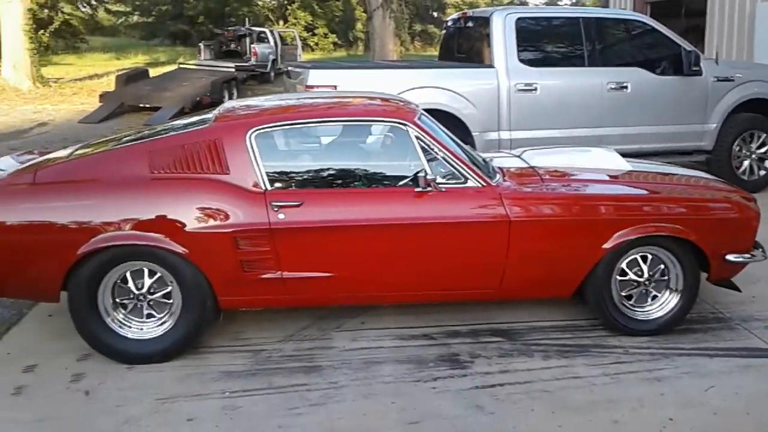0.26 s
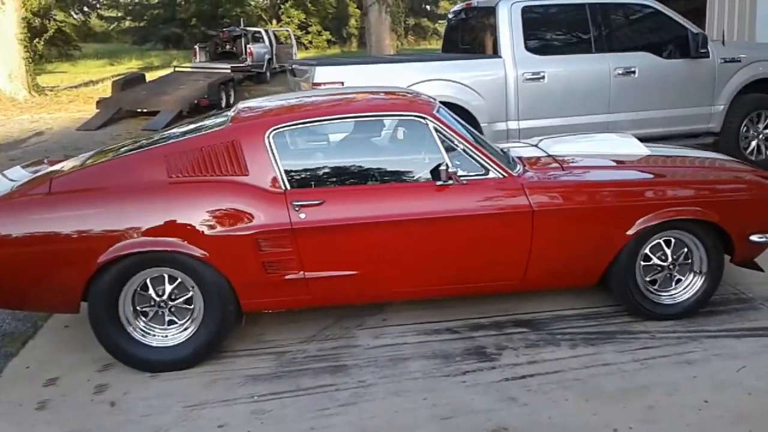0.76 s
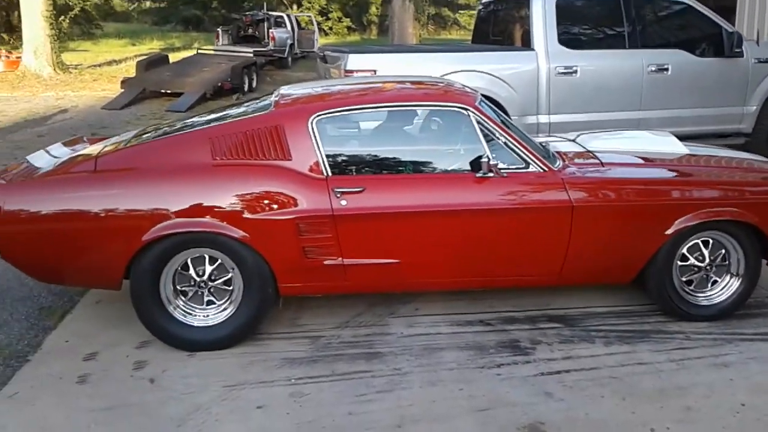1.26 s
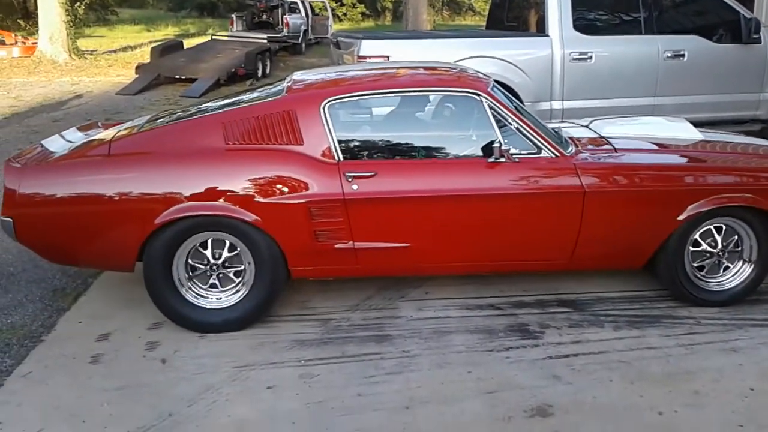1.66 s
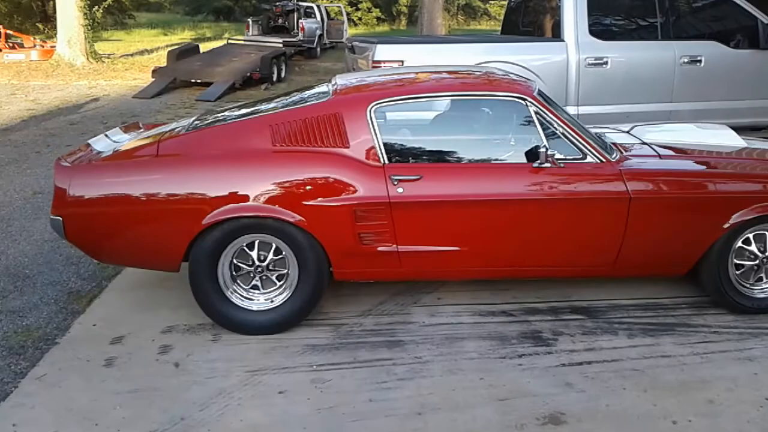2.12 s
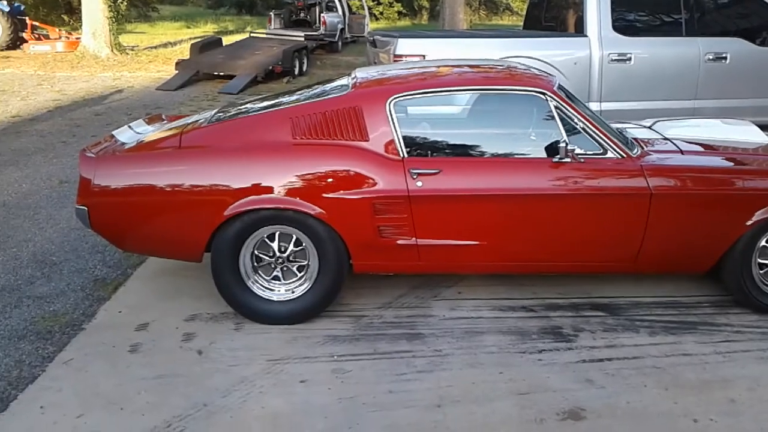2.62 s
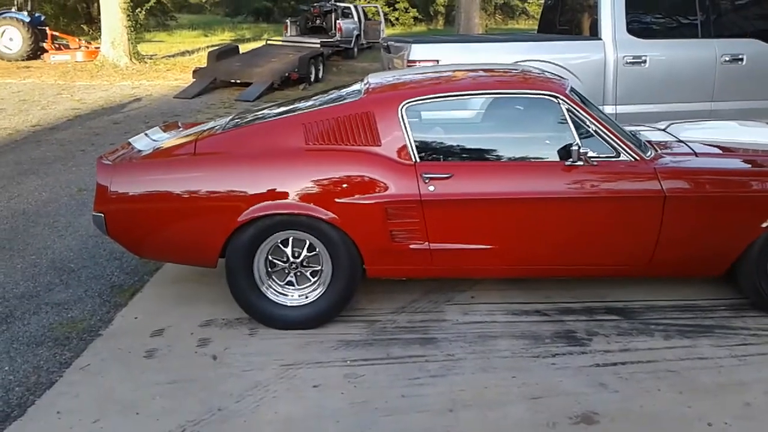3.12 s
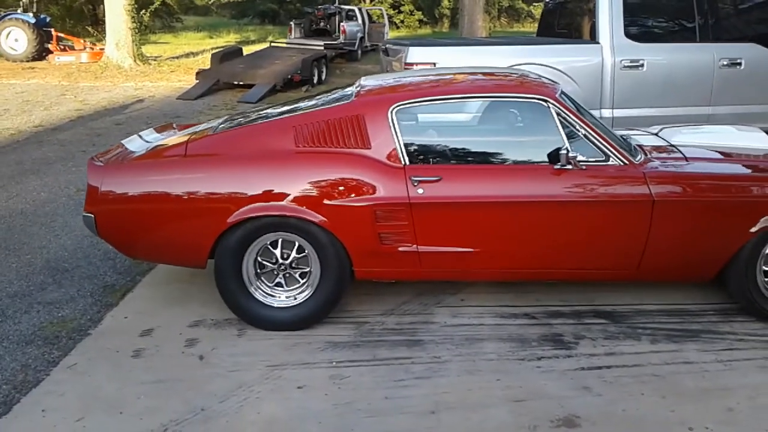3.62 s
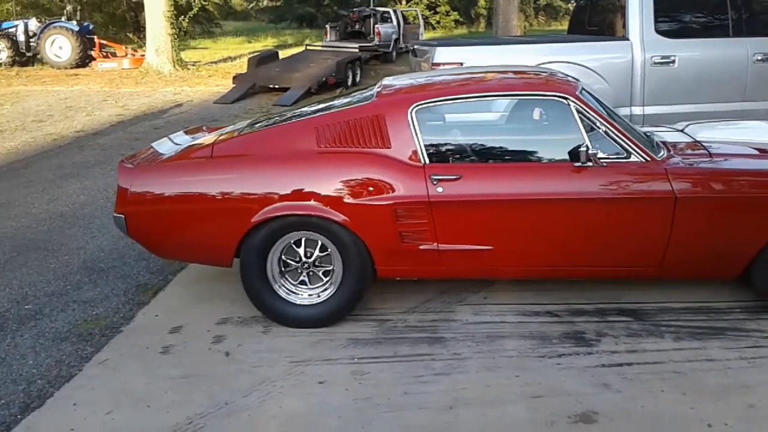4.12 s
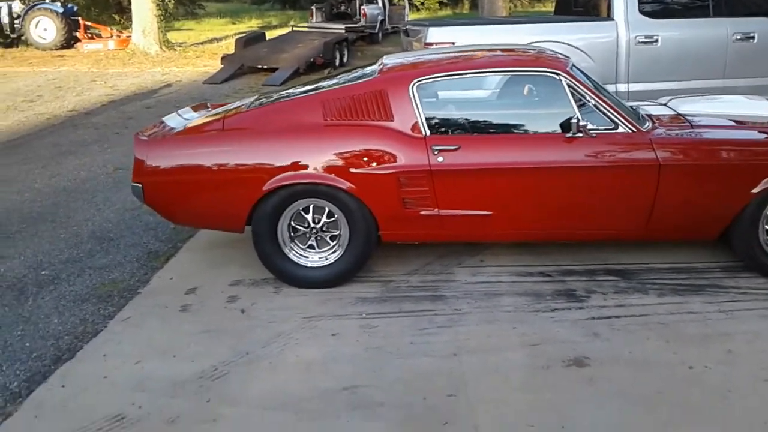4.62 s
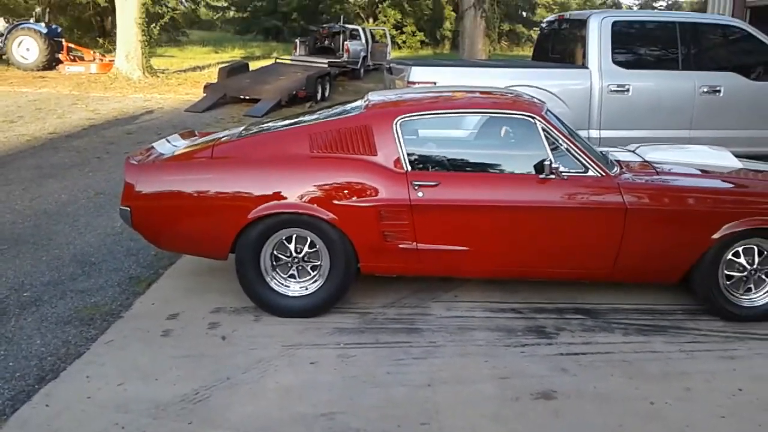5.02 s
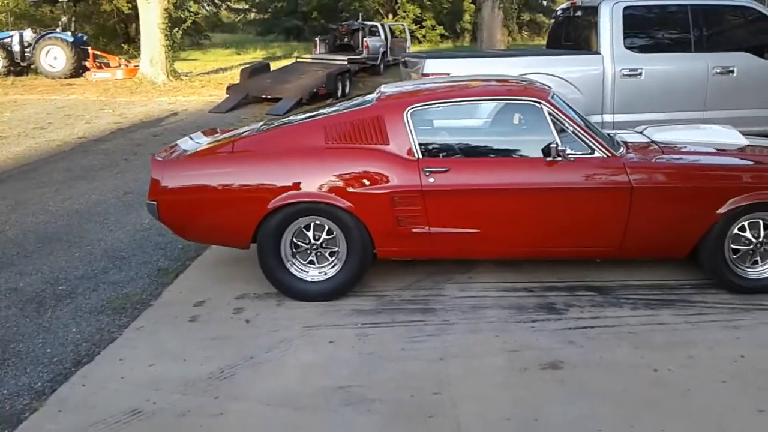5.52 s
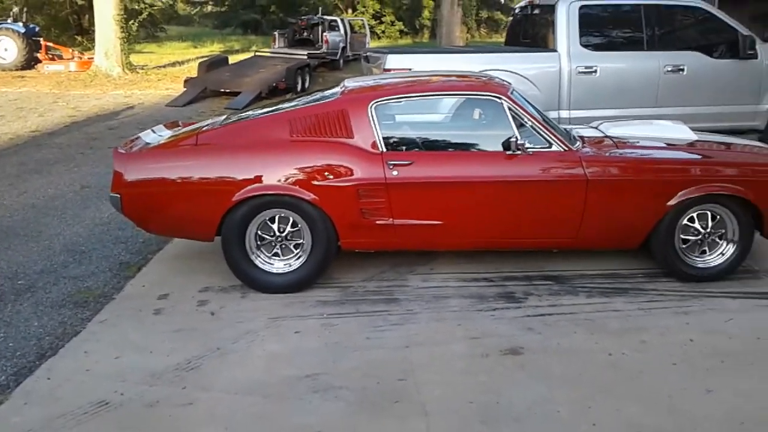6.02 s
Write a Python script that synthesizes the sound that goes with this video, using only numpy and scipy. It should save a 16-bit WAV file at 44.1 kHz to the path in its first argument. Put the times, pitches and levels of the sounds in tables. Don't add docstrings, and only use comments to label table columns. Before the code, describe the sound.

Outdoors, close and dry, a powerful car engine first runs smoothly at a low buzzing hum. After nearly a second it revs violently, pitch about tripling into a tearing, noisy bellow. It cuts off with a small pop and tumbles down within half a second. Then comes a long rough idle: uneven clusters of booming firings, short gaps, hollow barks, gas rasp and hiss, clipped and gritty on the phone microphone.

```python
import sys
import numpy as np
from scipy import signal
from scipy.fft import rfft, irfft, next_fast_len
from scipy.io import wavfile
from scipy.ndimage import uniform_filter1d, map_coordinates

SR = 44100
rng = np.random.default_rng(int(sys.argv[2]) if len(sys.argv) > 2 else 0)


def to_wav(sig):
    pcm = np.clip(np.atleast_2d(sig), -1, 1) * 32767
    pcm = np.round(pcm).astype(np.int16)
    wavfile.write(sys.argv[1], SR, pcm.T)


def nominal_scale(level):
    x = np.asarray(level, float) / 20
    return 10 ** x


N = 276507
TIME = np.arange(N) / SR

# time_s, shaft_turns_per_s
SPEED = [(0, 24.4), (.4, 24.7), (.7, 25.1), (.8, 25.7), (.89, 28), (.95, 33), (1.06, 45), (1.2, 59),
         (1.29, 65.5), (1.41, 70.3), (1.5, 73.4), (1.74, 74), (1.814, 63.8), (1.89, 52.5), (2.002, 42),
         (2.08, 30), (2.16, 25.5), (2.25, 24)]
# time_s, roar_db
THROTTLE = [
    (.8, -64),
    (.92, -28),
    (1.0, -17.5),
    (1.03, -9),
    (1.25, -7),
    (1.69, -7.3),
    (1.75, -22),
    (1.93, -37),
    (2.1, -70),
]
# frequency_hz, level_db
PIPE = [(55, -38), (88, -8), (115, -3.5), (124, -11), (142, -15), (205, -7), (250, -22), (300, -21)]
# order_per_turn, level_db
SHARP_ORDERS = [(12, -26), (20, -35)]
# order_per_turn, level_db
COASTING_ORDERS = [(1.5, -23), (2, -10.5), (2.5, -5.5), (4, -21), (5, -23.5), (6, -27)]
# start_s, firings_count, spacing_s, boom_db
FIRING_RUNS = [(2.27, 3, 0.048, -2.5), (2.468, 2, 0.085, -2), (2.621, 3, 0.041, -2), (2.761, 2, .043, -2.5),
               (2.877, 2, .036, -2.5), (2.936, 4, 0.036, -1), (3.088, 3, 0.036, -0.5), (3.238, 2, .036, -3),
               (3.32, 4, .022, -5.5), (3.421, 2, .039, -1), (3.487, 4, .0217, -5), (3.603, 2, .04, -6.5),
               (3.689, 2, .029, 0), (3.787, 5, 0.026, 0.5), (3.911, 3, 0.045, -1.5),
               (4.061, 3, 0.046, -0.5), (4.25, 3, 0.034, -6.5), (4.401, 5, 0.025, -3.5),
               (4.546, 4, .0425, -2), (4.733, 3, 0.036, -2.5), (4.838, 3, .04, -3.5), (4.973, 7, 0.048, -4),
               (5.29, 2, 0.019, 0), (5.371, 2, .017, 0.5), (5.433, 4, .031, -3.5), (5.58, 3, 0.038, 1.5),
               (5.672, 4, 0.034, -0.5), (5.812, 2, .046, 0.5), (5.93, 4, .044, -0.5), (6.114, 4, .044, 0.5)]
# time_s, level_db
BARKS = [(2.27, 14.5), (2.372, 23.5), (2.621, 1.5), (2.652, 22), (2.802, -1), (3.051, 4), (3.238, -17),
         (3.347, 18), (3.642, 7), (3.786, 9), (3.911, -8), (4.019, 3), (4.097, 21.5), (4.25, 15),
         (4.401, 23), (4.487, 19), (4.817, 22), (4.84, 18), (5.107, 9), (5.29, 12), (5.387, 17), (5.47, 25),
         (5.525, 13), (5.794, 0), (5.953, -2), (5.999, 12), (6.063, 2), (6.209, -3)]
# frequency_hz, width_hz
BOOM_MODE = (92, 31)
# frequency_hz, width_hz, level_db
BARK_MODES = [(154.5, 12.5, -5.5), (210, 19, -15.5), (272, 20, -29)]
# frequency_hz, level_db (per hz)
ROAR_COLOUR = [(100, -30), (250, -9), (400, -9), (900, -8), (1500, -2), (2300, -3), (3200, -14),
               (4200, -25), (5800, -33), (7500, -24), (9200, -16), (11500, -36), (16000, -32)]
# frequency_hz, width_hz, level_db
SHELL_MODES = [(576.7, 55, 7), (751, 84, -6), (1405, 100, 9.5), (1704, 56, 3.5), (1910, 26, 10),
               (2187.5, 62, 6.5), (2754, 62, 7)]
# time_s, peak_db
CLICKS = [
    (0.9821, -0.5),
    (1.0069, 1.5),
    (1.7194, -14),
    (1.7512, -4.5),
]
# time_s, flow_db, lumpiness_db
FLOW = [(0, -23.5, -15.5), (.63, -27, -19.5), (.87, -27, -25), (.96, -13.5, -10.5), (1.1, 14, -22.5),
        (1.68, -11, -22.5), (1.8, -19, -13), (1.97, -28.5, -32), (2.25, -31, -26), (2.3, -25.5, -17.5),
        (2.9, -24, -16.5), (3.3, -26.5, -22.5), (3.4, -24, -20), (4.5, -24.5, -18), (5.8, -23.5, -19.5),
        (6.27, -22, -16)]
# start_s, chuffs_count, spacing_s, hiss_peak_db, rasp_over_hiss_db
CHUFF_RUNS = [(2.272, 2, 0.035, -19.5, -0.5), (2.361, 3, 0.0935, -18.5, 4), (2.618, 3, 0.077, -23, 5.5),
              (2.852, 2, 0.059, -24, 8.5), (2.9586, 2, 0.07, -20, 4.5), (3.0434, 2, .033, -22, -20),
              (3.2664, 2, 0.063, -21, -6), (3.3647, 2, .054, -23, 1), (3.4645, 7, 0.0442, -24.5, 0.5),
              (3.78, 4, 0.05, -23, 1.5), (3.964, 2, 0.074, -30.5, 7), (4.0794, 2, 0.069, -22, 1.5),
              (4.2337, 2, 0.076, -17, 5), (4.4023, 2, 0.061, -21.5, 4.5), (4.5011, 3, 0.045, -21.5, 0.5),
              (4.6632, 2, 0.028, -23.5, -2), (4.7316, 4, 0.0366, -20.5, 1), (4.922, 4, 0.0487, -21, 3),
              (5.1456, 3, 0.074, -22.5, 6), (5.3686, 4, 0.064, -28, 9), (5.6006, 2, 0.055, -22, -8),
              (5.7039, 4, 0.0447, -23, -0.5), (5.8996, 4, 0.042, -19.5, -3), (6.0551, 2, 0.044, -21, -17)]
# frequency_hz, level_db (per hz)
FRONT_COLOUR = [(150, -38), (260, -12), (292, -2), (499, -17.5), (544, -9), (585, -9.5), (866, -6.5),
                (931, -15.5), (1570, -8), (2010, -9), (2290, -8.5), (2880, -14), (3280, -16), (5450, -30),
                (8300, -27.5), (10800, -61), (18300, -120)]
# frequency_hz, level_db (per hz)
RASP_COLOUR = [(210, -29), (350, -9), (451, -10.5), (561, -5.5), (616, -10), (740, 2), (976, -10),
               (1330, -5.5), (1430, -5), (2240, 0), (2510, -4), (3130, -5), (5500, -22), (7150, -33),
               (12100, -120)]
# frequency_hz, level_db (per hz)
HISS_COLOUR = [(2940, -50), (5000, -32), (6320, -12.5), (9220, 4), (9720, 1), (11700, -21), (15200, -53),
               (22000, -120)]
# frequency_hz, level_db (per hz)
FIZZ_COLOUR = [(6760, -57), (11500, -30), (12100, -19), (15100, -9), (15700, -14.5)]
# pulling_db, idling_db
HISS_DB = (-14.5, -11.5)
# frequency_hz, level_db (per hz)
RUMBLE_COLOUR = [(25, -35), (50, -39), (70, 0.5), (100, 5.5), (125, -13), (150, 5), (190, -10.5),
                 (225, -9.5), (280, -22), (310, -27.5), (600, -71)]

LOAD_DB, LOADED_S = -3, .5
THIRD_TOP_DB = -21.5
SHUT_S, CATCH_S = 1.69, 2.226
USUAL_BARK_DB, BOOM_SCATTER_DB, PUFF_SCATTER_DB = -14, 1.2, 1.8


def pull():
    rate, = curves(SPEED)
    angle = turns(rate * (1 + .004 * wobble(30)))

    octave = nominal_scale(-42 + .47 * rate + 3 * wobble(25)) * np.sin(8 * angle)
    even_db = along(PIPE, 4 * rate) + LOAD_DB * np.clip(1 - TIME / LOADED_S, 0, 1)
    even_db = even_db + 3.5 + (rate / 36) ** 1.8 * wobble(40)
    even = nominal_scale(even_db) * (np.sin(4 * angle) + octave)

    sounding = between(.2, 1.11, .2) * (TIME < .92) + between(1.02, 9, .03)
    once_a_turn = 1 + .55 * np.cos(angle + wobble(8))
    flutter = -sounding * once_a_turn * nominal_scale(2.5 * wobble(55) + .1 * (rate - rate[0]))
    sharp = flutter * sum(nominal_scale(db) * np.sin(order * angle) for order, db in SHARP_ORDERS)

    third_db = np.minimum(curves(THROTTLE)[0], THIRD_TOP_DB)
    third = nominal_scale(third_db + 4.5 * wobble(45)) * np.sin(3 * angle)
    return between(-1, 1.76, 0.06) * (even + sharp + third), 4 * angle


def overrun():
    rate, = curves(SPEED)
    angle = turns(rate)
    tone = np.zeros(N)
    for order, db in COASTING_ORDERS:
        order_db = db + along(PIPE, order * rate) + 3.0 + 0.92 * order * wobble(36)
        tone += nominal_scale(order_db) * np.sin(order * angle)
    return between(SHUT_S, CATCH_S, 0.02) * tone


def idle():
    firing_s, boom_db = unrolled(FIRING_RUNS, BOOM_SCATTER_DB)
    pushes = taps(firing_s - .001, -nominal_scale(boom_db + 55))
    boom = filtered(pushes, lambda f: mode(f, *BOOM_MODE) ** 2 / (1 + 1j * f / 170) ** 2)

    loud_s, loud_db = np.transpose(BARKS)
    usual_db = USUAL_BARK_DB + 5.9 * (boom_db - boom_db.mean())
    bark_s = np.append(loud_s, firing_s)
    bark_db = np.append(loud_db, usual_db)

    def upper_modes(f):
        return mode(f, 210, 87) ** 2 * sum(nominal_scale(db) * mode(f, hz, width) for hz, width, db in BARK_MODES)

    return boom + filtered(taps(bark_s + 0.0022, nominal_scale(0.86 * bark_db + 31.5)), upper_modes)


def roar(firing):
    level_db, = curves(THROTTLE)
    starts_s = np.flatnonzero(np.diff(np.floor(firing / (2 * np.pi)))) / SR
    cracks = taps(starts_s, nominal_scale(2.5 * rng.standard_normal(len(starts_s))))
    gated = (1 + .25 * np.cos(firing)) * rng.standard_normal(N)
    blast = .7 * coloured(cracks, ROAR_COLOUR) + coloured(gated, ROAR_COLOUR)
    return nominal_scale(level_db + .7 * wobble(60)) * shell(blast, ring_db=0)


def clicks():
    click_s, peak_db = np.transpose(CLICKS)
    t = np.arange(SR // 50) / SR
    burst = nominal_scale(-60 * t / .003) * rng.standard_normal(len(t))
    return signal.fftconvolve(taps(click_s, nominal_scale(peak_db + 2.5)), burst)[:N]


def gas(firing):
    flow_db, rumble_db = curves(FLOW)
    chuff_s, peak_db, over_db = unrolled(CHUFF_RUNS, PUFF_SCATTER_DB)
    front = nominal_scale(-0.7) * (1 + .3 * np.sin(firing)) * turbulence(FRONT_COLOUR)
    rasp = nominal_scale(-1.27) * chuffing(chuff_s, peak_db + over_db, drain_s=0.047, leak=0.83)
    rasp = rasp * shell(turbulence(RASP_COLOUR), ring_db=-14.5)
    hiss = nominal_scale(-0.76) * chuffing(chuff_s, peak_db, drain_s=0.011, leak=0.32) * turbulence(HISS_COLOUR)
    fizz = nominal_scale(-7) * chuffing(chuff_s, 1.2 * peak_db, drain_s=.015, leak=.22) * turbulence(FIZZ_COLOUR)

    pulling, idling = between(-1, 1, .08), between(1.72, 9, .05)
    hiss_gain = pulling * nominal_scale(HISS_DB[0]) + idling * nominal_scale(HISS_DB[1])
    jet = pulling * front + idling * rasp + hiss_gain * (hiss + (1 + .5 * pulling) * fizz)
    rumble = coloured(rng.standard_normal(N), RUMBLE_COLOUR)
    return nominal_scale(flow_db) * jet + nominal_scale(rumble_db + 0.5) * rumble


def turbulence(colour):
    gusts = nominal_scale(0.86 * wobble(13) + 1.06 * wobble(200))
    return gusts * coloured(rng.standard_normal(N), colour)


def chuffing(start_s, db, drain_s, leak):
    t = np.arange(SR // 8) / SR
    puff = (1 - np.exp(-t / .005)) * np.exp(-t / drain_s)
    pushes = taps(start_s - .003, nominal_scale(db - np.mean(db)))
    pressure = np.abs(signal.fftconvolve(pushes, puff)[:N]) + leak
    return pressure / uniform_filter1d(pressure, size=SR // 4)


def shell(x, ring_db):
    def response(f):
        return 1 + sum(nominal_scale(db + ring_db) * mode(f, hz, width) for hz, width, db in SHELL_MODES)

    return unit(filtered(x, response))


def mode(f, hz, width):
    return 1j * f * width / (hz * hz - f * f + 1j * f * width)


def turns(rate):
    return 2 * np.pi * np.cumsum(rate) / SR


def unrolled(runs, scatter_db):
    start_s, count, spacing_s, *levels_db = np.array(runs).T[..., None]
    k = np.arange(8)
    used = k < np.round(count)
    times = (start_s + k * spacing_s)[used]
    return [times] + [(db + scatter_db * rng.standard_normal(used.shape))[used] for db in levels_db]


def taps(times, gains):
    return np.bincount(np.round(times * SR).astype(int), gains, N)[:N]


def filtered(x, response):
    m = next_fast_len(N + SR // 2)
    return irfft(rfft(x, m) * response(np.fft.rfftfreq(m, 1 / SR)), m)[..., :N]


def coloured(x, points):
    return unit(filtered(x, lambda hz: nominal_scale(along(points, hz))))


def along(points, hz):
    f, db = np.transpose(points)
    return np.interp(np.log(hz + 1), np.log(f + 1), db)


def unit(x):
    return x / np.sqrt(np.mean(x ** 2) + 1e-20)


def curves(rows):
    s, *cols = np.transpose(rows)
    return [np.interp(TIME, s, c) for c in cols]


def wobble(rate):
    return map_coordinates(rng.standard_normal(int(N * rate / SR) + 4), [TIME * rate])


def between(start, stop, fade):
    return np.clip(np.minimum(TIME - start, stop - TIME) / fade, 0, 1)


def scene():
    tone, firing = pull()
    return (tone + overrun() + idle() + roar(firing) + clicks() + gas(firing))[None]


def roll_off(x):
    return signal.sosfilt(signal.butter(12, 16440, fs=SR, output="sos"), x)


def record(dry):
    def lift(hz):
        return (1 + 1j * hz / 900) / (1 + 1j * hz / 2200)

    def dulling(hz):
        top = np.where(hz < 15800, 1, .15)
        shelf = 1 - 0.3 / (1 + (9500 / (hz + 1)) ** 8)
        notch = 1 - 0.4 * np.abs(mode(hz, 5050, 2180))
        return top * shelf * notch

    flat = nominal_scale(1.0) * filtered(dry, lambda hz: (1j * hz / (42 + 1j * hz)) ** 3 / lift(hz))
    soft = flat / (1 + np.abs(flat / .82) ** 12) ** (1 / 12)
    bright = filtered(soft, lift)
    squeezed = bright / (1 + np.abs(bright / 1.15) ** 4) ** (1 / 4)
    full = .87
    wrapped = (squeezed + full) % (2 * full) - full
    return roll_off(nominal_scale(0.5) * filtered(wrapped, dulling))


dry = scene()
out = record(dry)
to_wav(out)
```